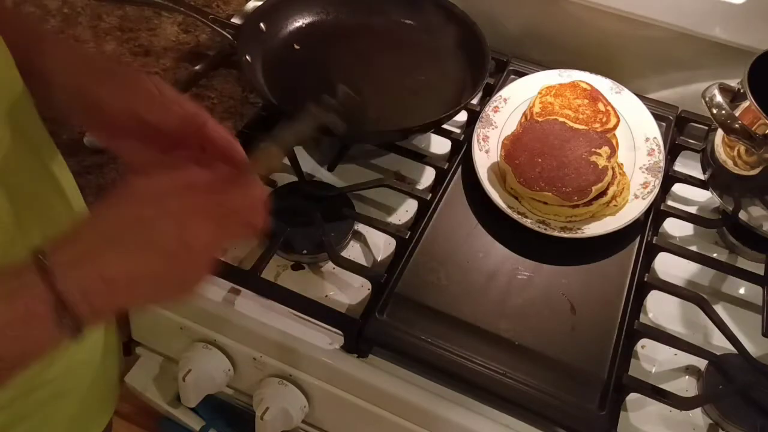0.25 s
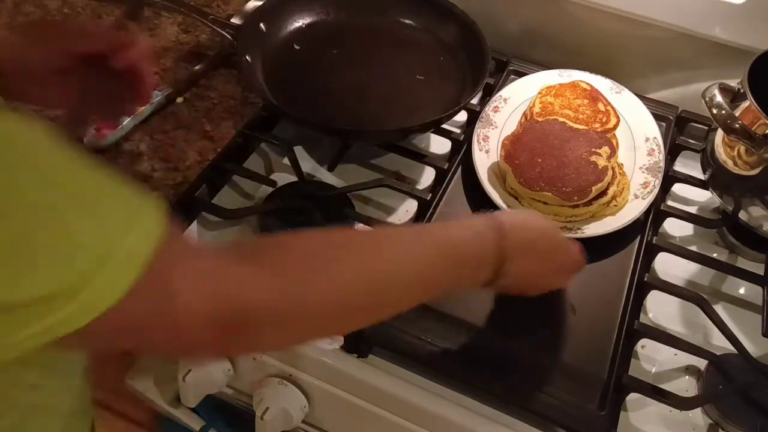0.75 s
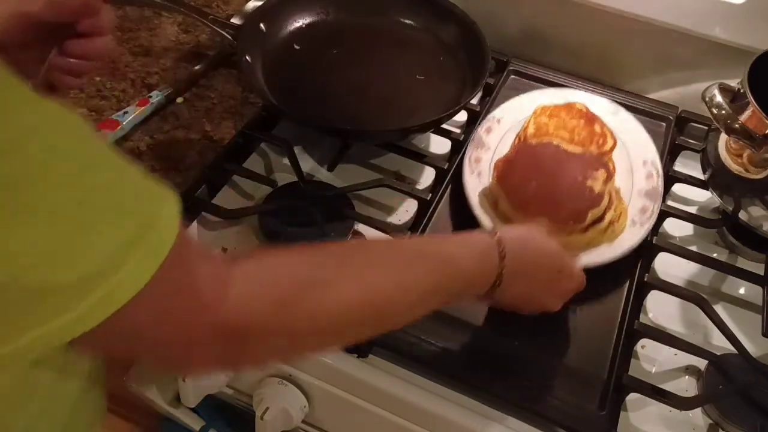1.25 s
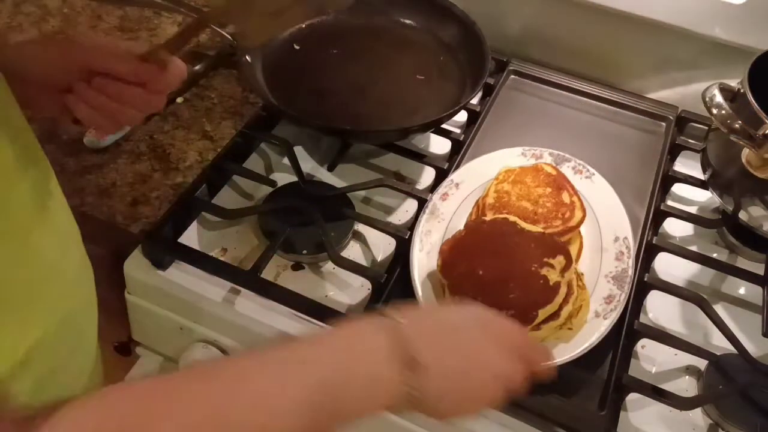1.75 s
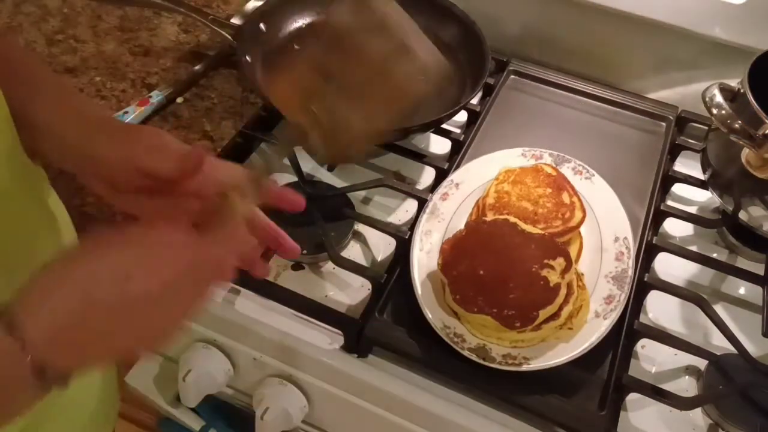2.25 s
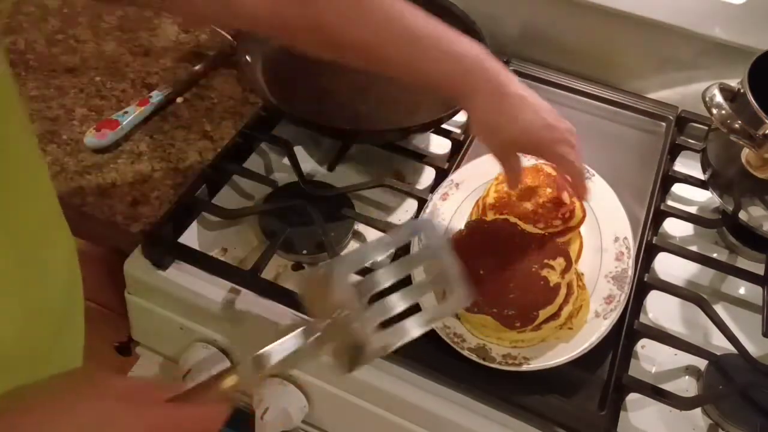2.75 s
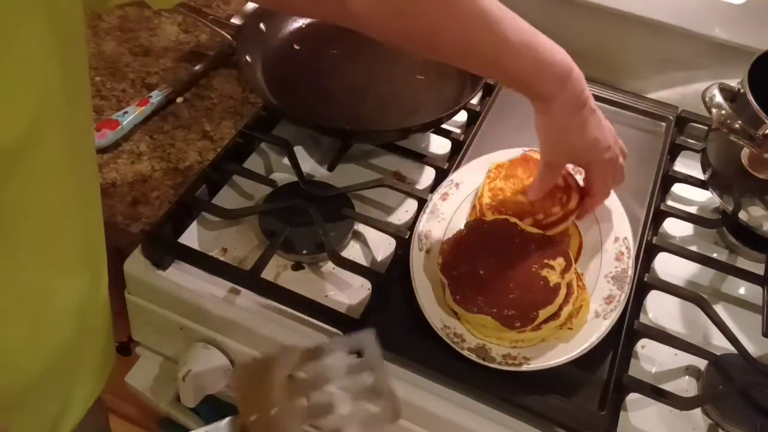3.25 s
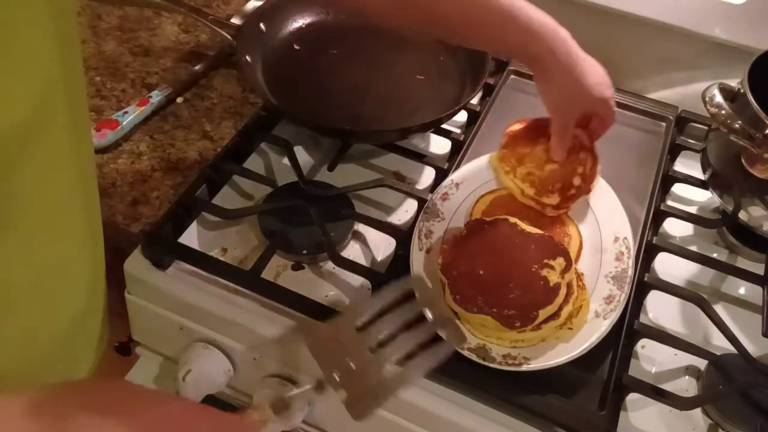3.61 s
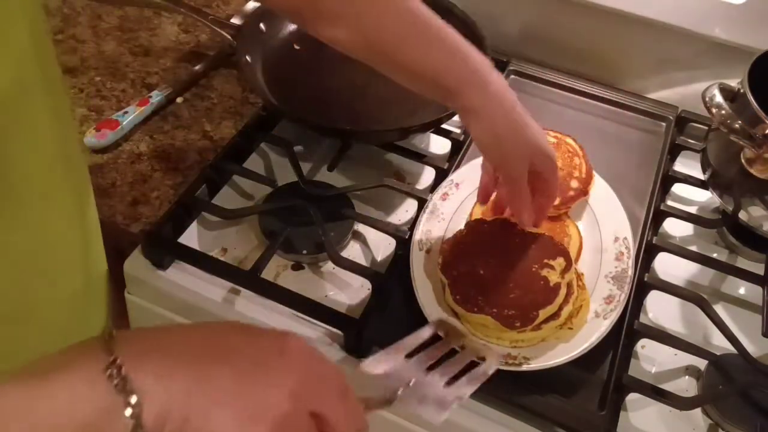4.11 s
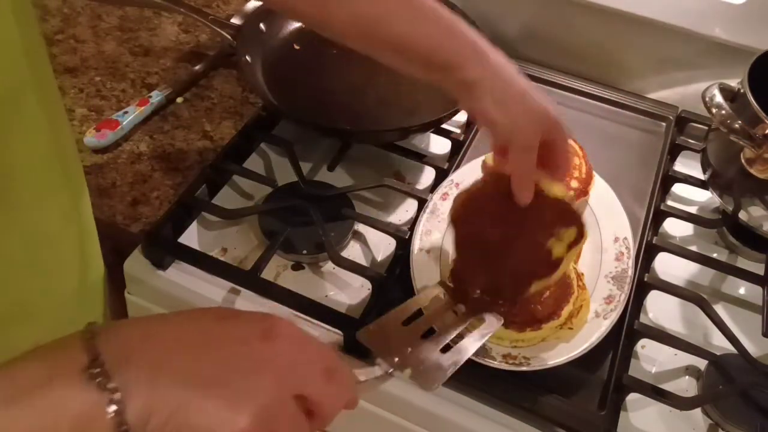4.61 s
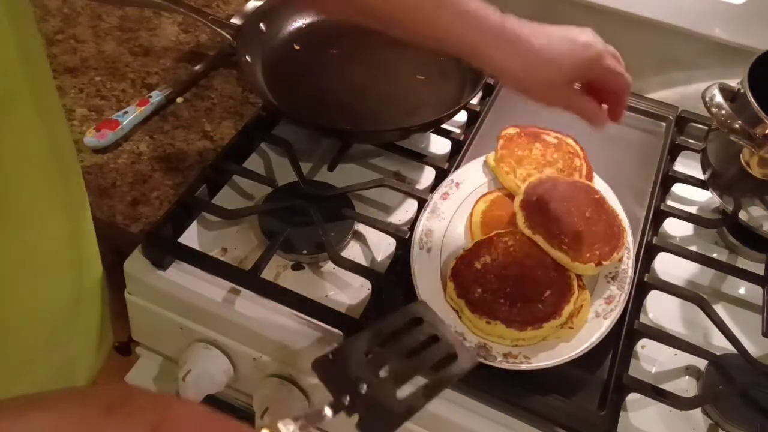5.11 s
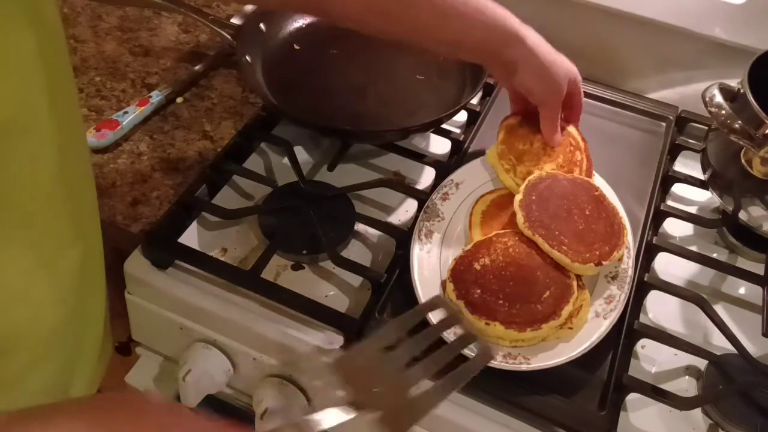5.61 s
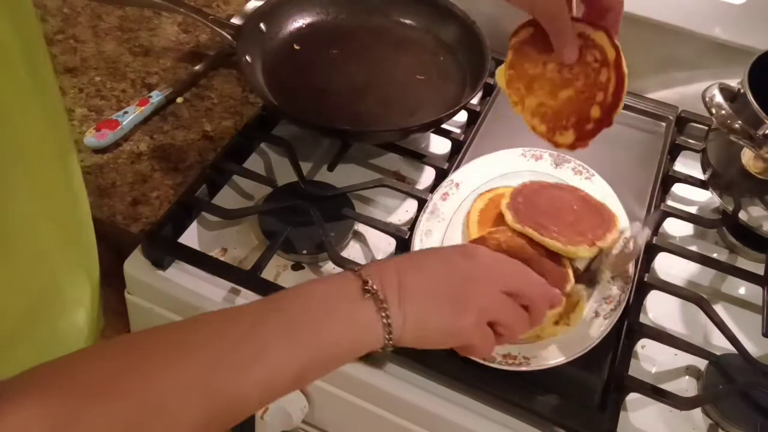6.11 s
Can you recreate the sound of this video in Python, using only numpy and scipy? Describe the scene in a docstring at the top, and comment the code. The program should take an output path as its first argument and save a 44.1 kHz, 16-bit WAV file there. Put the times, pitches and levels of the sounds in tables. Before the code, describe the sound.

A low motor hum with soft hiss and a faint high whine runs throughout in a small kitchen, heard from close by. The first second holds only dull bumps and tiny metal ticks. At about 1.1 seconds a china plate knocks on a stove-top griddle and grates across it, with a brief squeak and two more knocks. At 1.8 seconds it is set down with a loud, rattling clack; the background dips and slowly comes back. From 3 seconds a steel spatula taps the china with short rings, clearest at 3.7 and 4.2 seconds. Pancakes peel off the stack with thin, quiet rasps around 3.5, 4.7 and 5.8 seconds. Just after 5 seconds the spatula clinks and the plate rocks once with a hollow, rattling knock. Faint ticks, a last soft peel and a light tap follow, ending near 6.4 seconds.

```python
"""A motor hums in a small kitchen, under faint metal ticks and dull bumps. After a second, a china plate
of pancakes knocks on a stove-top griddle, grates across it and is set down with a rattling clack; the
phone's limiter ducks under the scrape and the clack and recovers slowly. From three seconds on, a slotted
steel spatula taps the china, and pancakes are drawn off the stack with a thin rasp. Near five seconds
the plate rocks once, and the last taps and peels follow."""
import sys
import numpy as np
from scipy import signal
from scipy.fft import rfft, irfft
from scipy.io import wavfile
from scipy.ndimage import uniform_filter1d, minimum_filter1d

SR = 44100
rng = np.random.default_rng(int(sys.argv[2]) if len(sys.argv) > 2 else 0)


def unload_wav(signal):
    """Save mono or channel-first audio to the path in sys.argv[1] as 16-bit WAV at rate SR, clipped to [-1, 1]."""
    wavfile.write(
        sys.argv[1],
        SR,
        np.round(np.clip(np.atleast_2d(signal).T, -1, 1) * 32767).astype(np.int16),
    )


N = 280413
TIME = np.arange(N) / SR
RING_TIME = TIME[:SR // 2]


def undb(db):
    """Decibels to gain."""
    return 10 ** (np.asarray(db) / 20)


def unit(x):
    """Scale to rms 1."""
    return x / np.sqrt(np.mean(x ** 2))


def unit_energy(x):
    """Scale to energy 1."""
    return x / np.sqrt(np.sum(x ** 2))


def fade(t60):
    """A decay that loses 60 dB in t60 seconds."""
    return np.exp(-np.log(1000) * RING_TIME / t60)


def ramp(start, length):
    """A straight rise from 0 to 1."""
    return np.clip((TIME - start) / length, 0, 1)


def swell(at, width):
    """A bell-shaped envelope."""
    return np.exp(-.5 * ((TIME - at) / width) ** 2)


def through(x, response):
    """Convolve, keeping the length."""
    return signal.fftconvolve(x, response)[:len(x)]


def colour(x, points, size=4096):
    """Minimum-phase EQ through (Hz, dB) points."""
    hz, db = np.transpose(points)
    log_gain = np.log(undb(np.interp(np.log(np.fft.rfftfreq(size, 1 / SR) + 1), np.log(hz + 1), db)))
    cepstrum = irfft(log_gain)
    cepstrum[1:size // 2] *= 2
    cepstrum[size // 2 + 1:] = 0
    return through(x, irfft(np.exp(rfft(cepstrum))))


def cut(x, hz, kind):
    """Second-order low-pass or high-pass."""
    return signal.sosfilt(signal.butter(2, hz, kind, fs=SR, output="sos"), x)


def cut_backwards(x, hz, kind):
    """The same filter run in reverse, to undo a forward pass's phase shift."""
    return cut(x[..., ::-1], hz, kind)[..., ::-1]


def resonate(x, hz, width_hz):
    """One resonance with steep skirts."""
    radius, angle = np.exp(-np.pi * width_hz / SR), 2 * np.pi * hz / SR
    poles = [1, -2 * radius * np.cos(angle), radius ** 2]
    ring = signal.lfilter([(1 - radius ** 2) * np.sin(angle)], poles, x)
    return cut(cut(ring, hz / np.sqrt(2), "high"), hz * np.sqrt(2), "low")


def mode(force, hz, width_hz, db=0):
    """A struck resonance with its energy set in dB."""
    return undb(db) * unit_energy(resonate(force, hz, width_hz))


def walk(rate):
    """A smooth random wobble with a spread near 1."""
    step = int(SR / rate)
    return np.sqrt(2) * uniform_filter1d(np.repeat(rng.standard_normal(N // step + 1), step), step)[:N]


def tone(hz, drift_hz):
    """A sine of rms 1 whose pitch drifts a little."""
    return unit(np.sin(2 * np.pi * (np.cumsum(hz + drift_hz * walk(6)) / SR + rng.random())))


def grains(per_s, spread_db):
    """Random slips of uneven size."""
    slips = (rng.random(N) < per_s / SR) * rng.choice([-1, 1], N)
    return unit(slips * undb(spread_db * rng.standard_normal(N)))


def contact(chatter_s, chatter_db):
    """A sharp first touch and the quick chatter that follows it."""
    chatter = rng.standard_normal(len(RING_TIME)) * np.exp(-RING_TIME / chatter_s)
    force = undb(chatter_db) * unit_energy(chatter)
    force[0] += 1
    return force


def add(out, at, sound, db):
    """Place a hit so that its first 10 ms have the given level."""
    start = int(at * SR)
    attack_rms = np.sqrt(np.mean(sound[:SR // 100] ** 2))
    out[start:start + len(sound)] += (sound * undb(db) / attack_rms)[:N - start]


# The room tone's EQ. Each row: frequency in Hz, relative level in dB.
ROOM_EQ = [(30, -47.5), (60, -31.5), (130, -29.5), (215, -14.5), (280, -22), (370, -25.5), (450, -29),
           (820, -31), (1300, -43), (2800, -45), (3700, -44), (4500, -48.5), (6300, -39.5), (7400, -38),
           (8000, -48), (12000, -62.5), (16000, -62)]
def room_tone(db, apart_db):
    """Stereo noise: a shared part, plus each side's own at apart_db."""
    shared = rng.standard_normal(N)
    sides = [colour(shared + undb(apart_db) * rng.standard_normal(N), ROOM_EQ) for _ in range(2)]
    return undb(db) * np.array([unit(side) for side in sides])


# Motor and mains hum. Each row: pitch in Hz, level in dB before the trim.
HUM_LINES = [(101.4, -62.5), (120, -65), (152.1, -69), (202.8, -46), (240, -48), (259, -62), (341, -60.5),
             (360, -61.5)]
def motor_hum(trim_db=.25, waver_db=.82):
    """Low hum lines, each wavering on its own."""
    return sum(undb(db + trim_db + waver_db * walk(2.7)) * tone(hz, drift_hz=.6) for hz, db in HUM_LINES)


def whine(hz=5040, start_db=-73, rise_db=4.5, rise_s=3.2):
    """A thin, breathy tone that grows at first."""
    breath = unit(resonate(rng.standard_normal(N), hz, width_hz=70))
    level_db = start_db + rise_db * ramp(0, rise_s) + walk(6)
    return unit(tone(hz, drift_hz=12) + undb(-4) * breath) * undb(level_db)


def background():
    """The bed: hum and a low rush, with a wider, flickering hiss and the whine fading in on top."""
    rush = cut_backwards(cut(room_tone(-50, apart_db=-7), 1500, "low"), 1500, "low")
    hiss = cut_backwards(cut(room_tone(-51, apart_db=-1), 1400, "high"), 1400, "high")
    fade_in = undb(-6.5 * (1 - ramp(0, .36)))
    return motor_hum() + rush + (hiss * undb(walk(9)) + whine()) * fade_in


# Dull bumps as the plate lands and the cook moves.
# Each row: centre in seconds, width in seconds, then rumble, boom and overtone levels in dB.
SOFT_PUSHES = [(0.102, 0.067, -58.5, -40.5, -69), (0.36, 0.12, -50.5, -35.5, -58),
               (.53, 0.084, -51.5, -37, -64), (1.891, .045, -46, -42, -50), (3.141, 0.058, -68, -31, -46),
               (3.231, 0.062, -66, -38.5, -70), (3.57, 0.033, -70, -36, -44.5),
               (5.161, 0.066, -46.5, -40, -40)]
def bumps(pitches_hz=(76.7, 214, 335.7), width_hz=28):
    """Soft pushes set low resonances of the stove and room booming."""
    out = np.zeros(N)
    for at, width_s, *levels_db in SOFT_PUSHES:
        shape = swell(at, width_s)
        for hz, db in zip(pitches_hz, levels_db):
            boom = shape * resonate(resonate(rng.standard_normal(N), hz, width_hz), hz, 2 * width_hz)
            out += undb(db) * unit_energy(boom) * np.sqrt(np.sum(shape ** 2))
    return out


# The EQ of light rubbing. Each row: frequency in Hz, relative level in dB.
SCUFF_EQ = [(530, -65), (900, -40), (1060, -17.5), (1580, -16), (1690, -15), (2150, -11.5), (2450, -15.5),
            (3580, -10), (4710, -13.5), (7500, -4), (9290, -22), (15500, -59)]
def light_scuff(force):
    """Light friction: thin and bright, with no low end."""
    return colour(force, SCUFF_EQ)


# Ticks of a bracelet, or of steel on the rim.
# Each row: start in seconds, level in dB, pitch in Hz, chatter in seconds.
METAL_TICKS = [(0.402, -52, 7280, 0.033), (.497, -59, 7870, 0.02), (0.924, -55.5, 7500, 0.002),
               (0.962, -57, 9200, 0.011), (1.0, -57, 8500, 0.0054), (3.245, -60.5, 7300, 0.026),
               (3.46, -59, 7300, 0.0031), (4.522, -57, 7460, .006), (4.614, -57.5, 7700, .004),
               (6.05, -46.5, 7200, 0.057), (6.121, -44.5, 7260, 0.024)]
def light_ticks(width_hz=220, overtone_db=-9, scuff_db=-5):
    """Tiny bits of metal scuff and ring with three treble modes."""
    out = np.zeros(N)
    for at, db, hz, chatter_s in METAL_TICKS:
        force = contact(chatter_s, chatter_db=10.5)
        ring = sum(mode(force, hz * ratio, width_hz, k * overtone_db)
                   for k, ratio in enumerate([1, 1.15, 1.4]))
        scuff = undb(scuff_db) * unit_energy(light_scuff(force))
        add(out, at, cut(ring + scuff, 1400, "high"), db)
    return out


# The spatula's ring. Each row: pitch in Hz, relative level in dB, seconds to fall 60 dB.
BLADE_MODES = [(1039, -5.5, 0.082), (1174, -10, 0.1), (1878, 0, 0.055), (2300, -5, 0.062),
               (2443, -5, 0.031), (2600, -4, 0.24), (3624, 0.5, 0.068), (3960, -13.5, 0.019),
               (4640, 1.5, 0.1), (5820, 0.5, 0.035), (7260, -9, 0.12), (7127, 7.5, 0.075),
               (8400, -12.5, 0.1), (10450, -16, 0.089)]
def blade_modes(force):
    """The steel blade rings: yields each mode's pitch, level and signal, for the caller to mix."""
    for hz, db, t60 in BLADE_MODES:
        yield hz, db, resonate(force, hz, np.log(1000) / np.pi / t60)


# Pancakes leaving the stack. Each row: start and let-go in seconds, final level in dB, build-up in dB.
PEELS = [(3.437, 3.576, -45, 6), (4.601, 4.748, -39.5, 11.5), (5.699, 5.815, -41, 11.5),
         (6.2, 6.336, -59.5, 4)]
def pancake_peels(attack_s=.029, release_s=.016, patchy_db=1.3):
    """Pancakes are drawn off the stack, by hand or blade, with a thin rising rasp and a moist crackle."""
    rub = grains(per_s=3500, spread_db=4)
    rasp = unit(light_scuff(rub))
    shimmer = unit(sum(undb(db) * ring for hz, db, ring in blade_modes(rub) if hz > 2000))
    sheen = unit(resonate(rub, 7420, width_hz=870))
    crackle = unit(cut(cut(grains(per_s=1400, spread_db=4.5), 7500, "low"), 6200, "high"))
    sound = undb(-.5) * rasp + undb(-10) * shimmer + undb(-3) * sheen + undb(-16) * crackle
    strokes = np.zeros(N)
    for start, lets_go, db, build_db in PEELS:
        # friction builds until the pancake lets go, then dies at once
        build = undb(db - build_db * (1 - ramp(start, lets_go - start)))
        release = np.exp(-np.maximum(TIME - lets_go, 0) / release_s)
        strokes += ramp(start, attack_s) * build * release
    return sound * undb(patchy_db * walk(60)) * strokes


# The click of steel on china. Each row: frequency in Hz, relative level in dB.
CLICK_EQ = [(350, -20), (600, -4), (1050, -2.5), (1580, -14), (2610, -3), (2990, -18.5), (3660, -10),
            (5290, -18.5), (7140, -5), (10300, -20), (11000, -46), (12100, -25), (15500, -43)]
# Spatula hits. Each row: start in seconds, level in dB, low-pass in Hz, chatter in seconds,
# lean towards the odd modes in dB.
BLADE_TAPS = [(3.068, -53.5, 3200, 0.0047, -6.5), (3.742, -29.5, 7560, 0.003, 1),
              (4.178, -28, 5900, 0.0092, -6.5), (4.265, -47.5, 11900, 0.004, -2),
              (5.0343, -24.5, 11000, 0.0037, 13.5), (5.047, -29, 12000, 0.0041, -9),
              (5.165, -33.5, 11600, 0.00077, 0), (5.865, -43, 12000, 0.0025, -2),
              (6.348, -40, 8000, 0.0028, -4)]
def spatula_taps(click_db=-6, click_s=.0058):
    """Steel meets china with a click and a short ring; the spot struck favours odd or even low modes."""
    out = np.zeros(N)
    lowest_hz = BLADE_MODES[0][0]
    for at, db, bright_hz, chatter_s, odd_db in BLADE_TAPS:
        force = contact(chatter_s, chatter_db=4)
        blade = sum(undb(mode_db + odd_db * (-1) ** k * lowest_hz / hz) * unit_energy(ring)
                    for k, (hz, mode_db, ring) in enumerate(blade_modes(force)))
        click = colour(contact(chatter_s + click_s, chatter_db=11), CLICK_EQ)
        sound = unit_energy(blade) + undb(click_db) * unit_energy(click)
        add(out, at, cut(sound, bright_hz, "low"), db)
    return out


# The body of griddle and grates. Each row: frequency in Hz, relative level in dB.
GRIDDLE_EQ = [(120, -54), (260, -20.5), (370, -9), (470, -7.5), (560, -29.5), (720, -3.5), (950, -7.5),
              (1350, 0), (1700, -6.5), (2250, -6.5), (3100, -13), (4200, -17), (6000, -23), (7300, -19.5),
              (8300, -29.5), (11000, -38.5), (15500, -60.5)]
def griddle(force):
    """The iron's modes lie so close that they act as one EQ."""
    return colour(force, GRIDDLE_EQ)


# Squeaks in the drag. Each row: centre in seconds, pitch in Hz, width in seconds, level in dB.
FOOT_SQUEAKS = [(1.245, 6890, 0.02, -23.5), (1.24, 5920, 0.021, -27), (1.263, 3050, 0.0069, -18.5)]
def foot_squeaks(wobble=.0094):
    """The plate's foot ring sticks and slips in step with one mode."""
    out = np.zeros(N)
    for at, hz, width_s, db in FOOT_SQUEAKS:
        pitch_hz = hz * (1 + wobble * walk(200))
        out += undb(db) * swell(at, width_s) * np.sin(2 * np.pi * np.cumsum(pitch_hz) / SR)
    return out


# The china's ring on the griddle, dragged or knocked. Each row: pitch in Hz, relative level in dB.
PLATE_MODES = [(366.1, -43), (748.3, -45), (1206, -37), (1427, -36), (1879, -44), (2175, -40), (2595, -39),
               (2923, -45), (3914, -47), (4780, -47), (5292, -54), (5674, -51), (5905, -52), (6202, -54),
               (6885, -48), (7477, -54), (8290, -59), (8710, -57), (9286, -65), (9706, -75), (9991, -68),
               (10395, -79), (10729, -77), (10896, -72), (11332, -75), (11811, -74)]
def plate_drag(drag_db=-12, ease_db=-6.5, wander_db=5, judder_db=1.5, treble_db_per_s=14):
    """The unglazed foot ring grates over the griddle; each mode swells as the contact points shift."""
    # one pull: the plate creeps, breaks free, eases off, then brakes to rest
    grab_s, free_s, hardest_s, brake_s, rest_s = 1.135, 1.201, 1.363, 1.6346, 1.731
    creep = undb(-9)
    speed = creep * ramp(grab_s, .01) + (1 - creep) * ramp(free_s, .02)
    speed *= (1 - ramp(brake_s, rest_s - brake_s)) ** 1.8
    since_hardest = np.clip(TIME, grab_s, rest_s) - hardest_s
    pull_db = drag_db + ease_db * (since_hardest / (brake_s - hardest_s)) ** 2
    slips = grains(per_s=3000, spread_db=.5) * undb(judder_db * walk(90))
    china = sum(undb(db + np.log2(hz) + wander_db * walk(22)) * unit(resonate(slips, hz, width_hz=24))
                for hz, db in PLATE_MODES)  # tilted up 1 dB per octave
    hollow = unit(resonate(slips, 372, width_hz=32))
    scrape = undb(-5.5) * unit(china) + undb(-2) * unit(griddle(slips)) + undb(-12) * hollow
    # the scrape grows brighter along the way
    treble = cut_backwards(cut(scrape, 4400, "high"), 4500, "high")
    scrape += treble * (undb(-1.5 + treble_db_per_s * since_hardest) - 1)
    sound = cut(scrape * speed * undb(pull_db) + foot_squeaks(), 11000, "low")
    return cut(cut(sound, 290, "high"), 290, "high")


# The hollow under the griddle. Each row: pitch in Hz, bandwidth in Hz, relative level in dB.
HOLLOW_MODES = [(430, 67, -5.5), (503, 66, -3), (760, 130, -2), (929.5, 85, 7)]
# The plate's hits. Each row: start in seconds, level in dB, low-pass in Hz, chatter in seconds,
# rattle in dB, rattle length in seconds, hollow thump in dB.
PLATE_HITS = [(1.130, -11, 2200, 0.0037, -32, 0.036, -19), (1.284, -14.5, 1877, 0.0055, -12.5, .04, -25),
              (1.615, -11.5, 1300, 0.0037, -20.5, 0.035, -5.5), (1.769, 0.5, 5000, 0.012, -7.5, 0.15, -24),
              (5.063, -13.5, 1920, 0.0075, -9.5, 0.16, 0.5)]
def plate_knocks(china_db=-3, china_width_hz=35, rim_db=-11):
    """The plate lands on the griddle and rattles briefly as it settles; a softer contact is duller."""
    out = np.zeros(N)
    for at, db, bright_hz, chatter_s, rattle_db, rattle_s, thump_db in PLATE_HITS:
        settling = fade(.93) * np.exp(-(RING_TIME / rattle_s) ** 4)
        rattle = unit_energy(rng.standard_normal(len(RING_TIME)) * settling)
        force = unit_energy(contact(chatter_s, chatter_db=14)) + undb(rattle_db) * rattle
        china = unit_energy(sum(mode(force, hz, china_width_hz, level) for hz, level in PLATE_MODES))
        iron = unit_energy(griddle(force))
        # the rim mode outlasts the others; a blow near the middle also booms the hollow
        rim = mode(force, 1890, width_hz=8, db=rim_db)
        thump = unit_energy(sum(mode(force, *row) for row in HOLLOW_MODES))
        sound = iron + undb(china_db) * china + rim + undb(thump_db) * thump
        add(out, at, cut(cut(sound, bright_hz, "low"), 300, "high"), db)
    return out


def kitchen(x, early_db=-1, tail_db=-11):
    """Direct sound, quick bright reflections from stove and backsplash, then the room's tail."""
    sides = []
    for _ in range(2):
        early, low, high = rng.standard_normal((3, len(RING_TIME)))
        early = unit_energy(cut(early * fade(.032) * (RING_TIME > .001), 2200, "high"))
        low = cut(low, 3100, "low") * fade(.27)
        high = cut(cut(high, 3300, "high"), 6200, "low") * fade(.25)
        tail = unit_energy((low + high) * (RING_TIME > .008))
        sides.append(x + through(x, undb(early_db) * early + undb(tail_db) * tail))
    return np.array(sides)


def scene():
    """Plate, spatula, pancakes and ticks in the kitchen's reverb, over the bumps and the bed."""
    sources = plate_knocks() + plate_drag() + spatula_taps() + pancake_peels() + light_ticks()
    return kitchen(sources) + bumps() + background()


def limiter(x, knee_db=-6.5, ratio=2.4, release_db_per_s=7.5, ahead_samples=660, ceiling=.9):
    """Looks ahead, turns the gain down for peaks above the knee and lets it climb back slowly."""
    peak = np.abs(x).max(axis=0) + 1e-9
    duck_db = np.maximum(20 * np.log10(peak) - knee_db, 0) * (1 - 1 / ratio)
    ahead_db = -minimum_filter1d(-duck_db, ahead_samples, origin=-ahead_samples // 2)
    held_db = np.maximum.accumulate(ahead_db + release_db_per_s * TIME) - release_db_per_s * TIME
    x = x * undb(-uniform_filter1d(held_db, ahead_samples // 2))
    return x / (1 + (x / ceiling) ** 8) ** (1 / 8)  # soft-clip what is still too loud


# The balance of the phone's microphone ports. Each row: frequency in Hz, left over right in dB.
PORT_BALANCE = [(100, 7.5), (1000, 9), (2500, 10), (5000, 8.5), (7000, 16.5), (8800, 2), (12000, -3.5)]
def record(dry, lag_samples=34, top_hz=15800):
    """Two unequal ports, the left louder and a little later, then the limiter and a steep top cut."""
    hz, balance_db = np.transpose(PORT_BALANCE)
    right_db = 20 * np.log10(2 / (1 + undb(balance_db)))
    left = colour(np.pad(dry[0], (lag_samples, 0))[:N], np.c_[hz, right_db + balance_db])
    right = colour(dry[1], np.c_[hz, right_db])
    top_cut = signal.ellip(10, .1, 80, top_hz, fs=SR, output="sos")
    return signal.sosfilt(top_cut, limiter(np.array([left, right])))


dry = scene()
out = record(dry)
unload_wav(out)
```